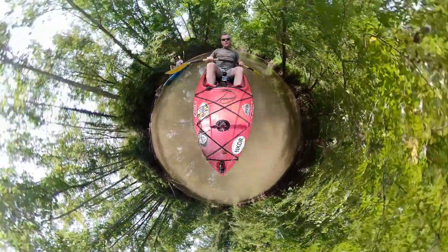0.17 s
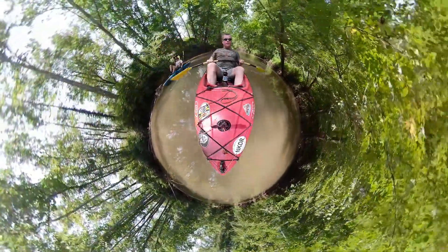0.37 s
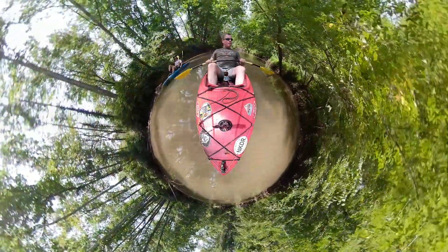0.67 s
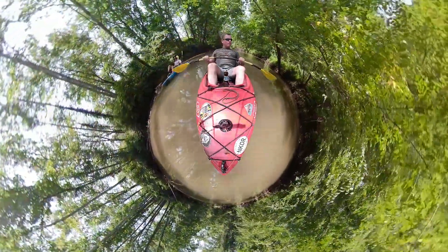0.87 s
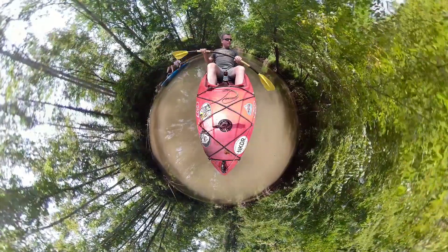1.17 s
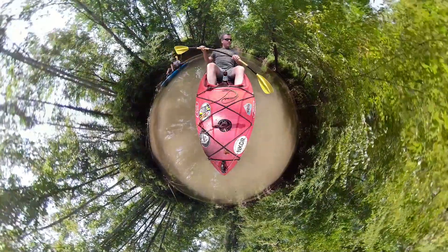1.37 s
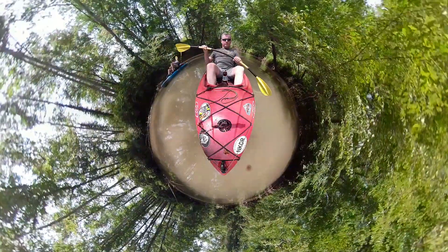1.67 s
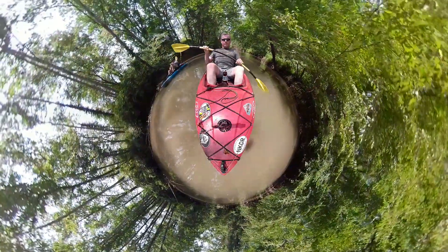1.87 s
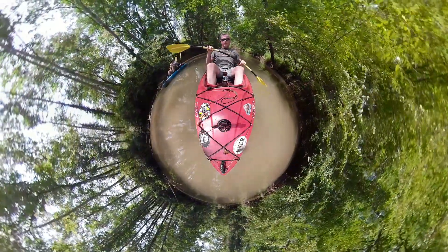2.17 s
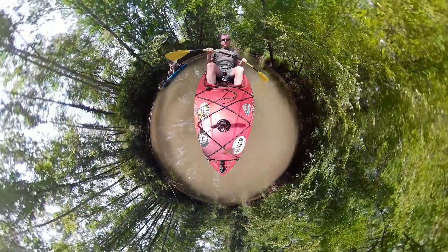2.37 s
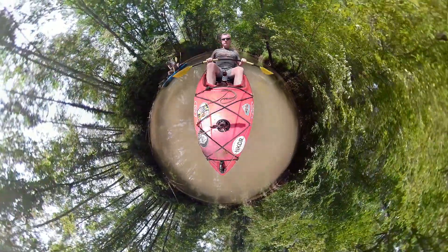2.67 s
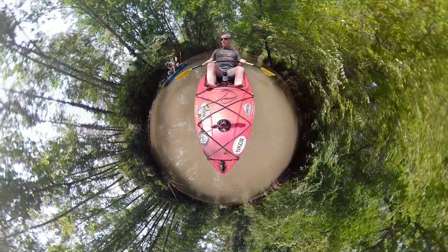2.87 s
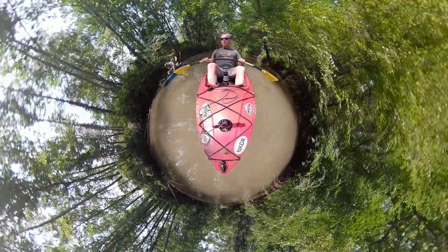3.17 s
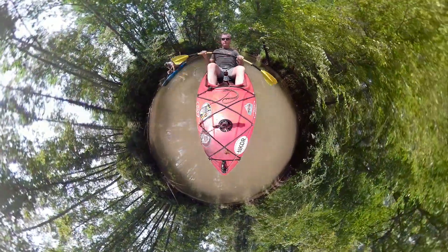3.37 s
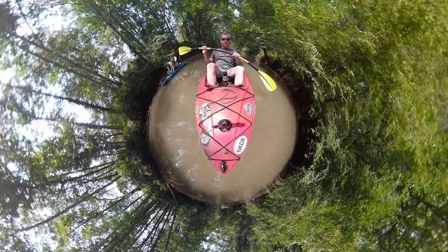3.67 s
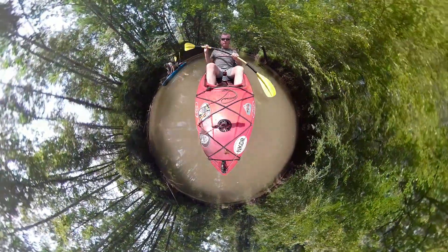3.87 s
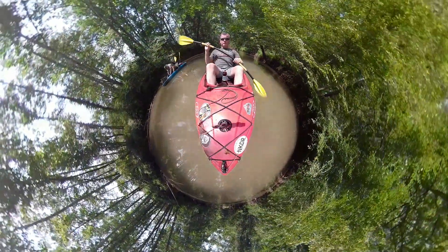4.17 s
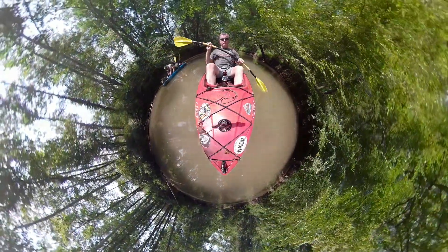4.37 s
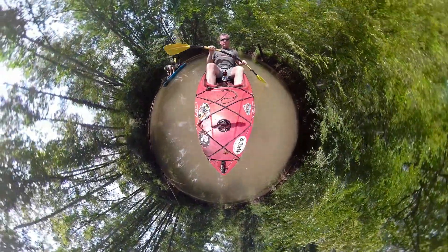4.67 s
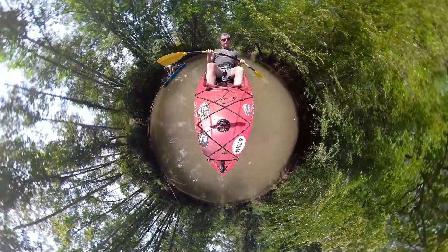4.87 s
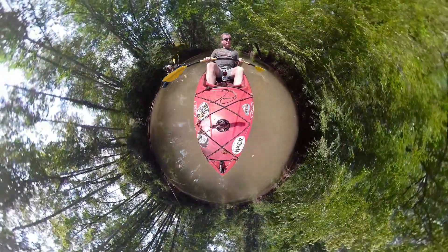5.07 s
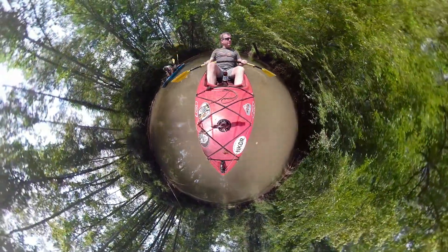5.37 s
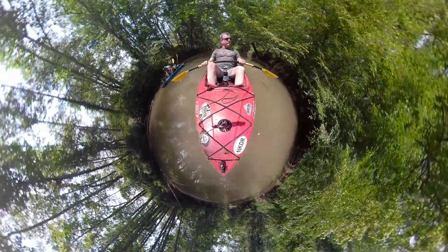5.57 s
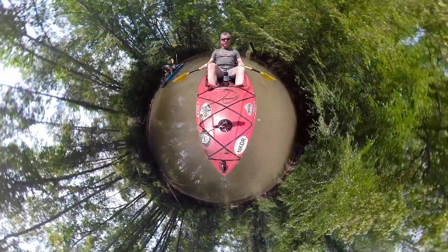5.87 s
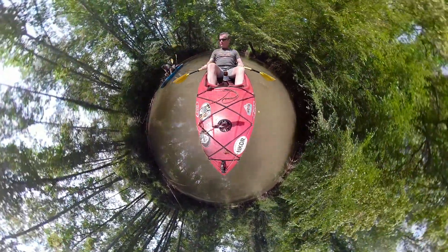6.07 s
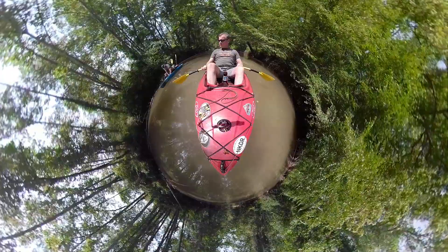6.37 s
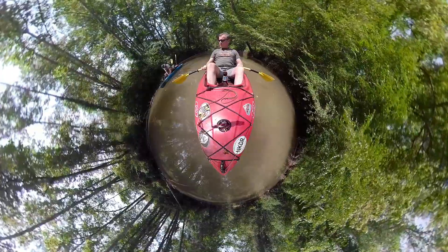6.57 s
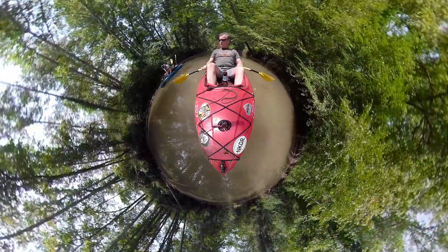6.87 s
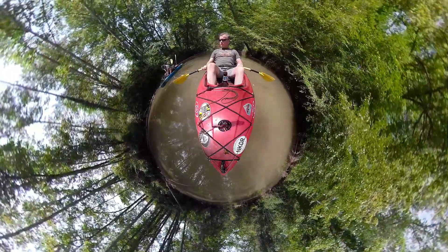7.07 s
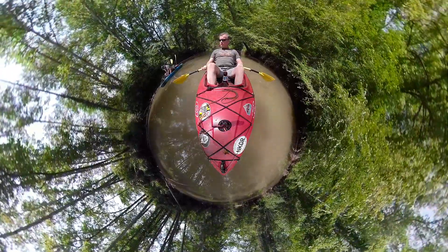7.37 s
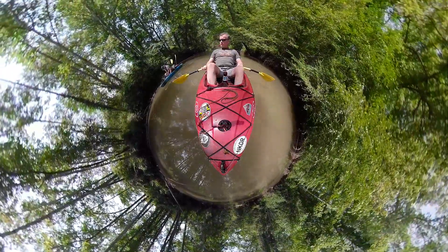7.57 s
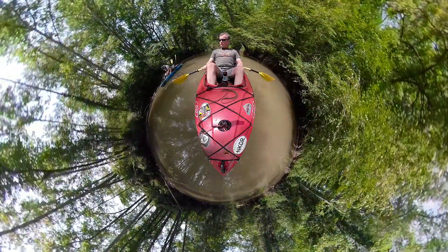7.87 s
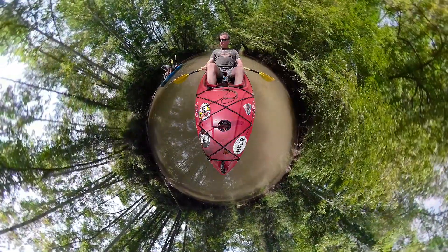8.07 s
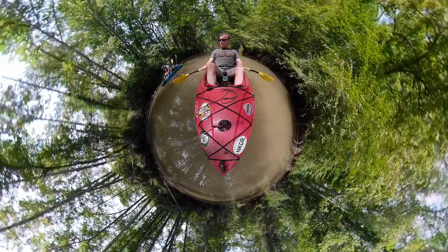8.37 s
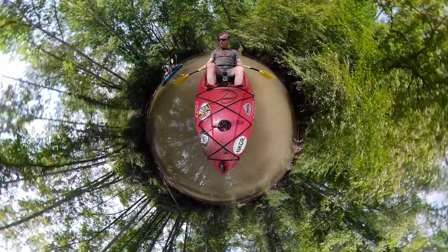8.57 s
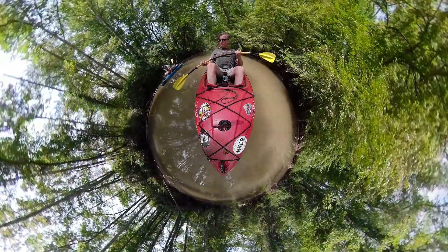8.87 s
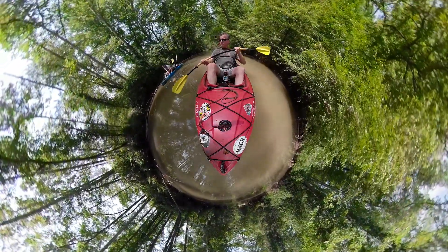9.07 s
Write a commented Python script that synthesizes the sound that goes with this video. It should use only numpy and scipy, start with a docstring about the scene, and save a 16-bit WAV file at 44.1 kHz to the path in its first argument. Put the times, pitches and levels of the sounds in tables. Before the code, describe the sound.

Water laps and knocks on a hollow kayak hull while a paddle drips and trickles, with faint birds and cicadas behind.

```python
"""On a forest river, on the deck of a drifting kayak. Water laps and knocks at the hollow hull,
which rings like a drum. The paddle sheds drips that trap ringing air bubbles, its shaft squeaks
and its blade dips with soft plops. In the trees, birds whistle with long echoes and cicadas hiss."""
import sys
import numpy as np
from scipy import signal
from scipy.io import wavfile
from scipy.ndimage import uniform_filter1d

SR = 44100
rng = np.random.default_rng(int(sys.argv[2]) if len(sys.argv) > 2 else 0)


def wav_out(sig):
    """Save sig, one row per channel (or a flat mono array), as 16-bit PCM at SR to the path in sys.argv[1]."""
    wavfile.write(sys.argv[1], SR, np.round(np.clip(np.atleast_2d(sig).T, -1, 1) * 32767).astype(np.int16))


N = 407484

# Blows on the hull, and one brief scraping rub:
# start_s, level_db, slap_db (added to level_db), spot_hz (pitch of the spot touched)
HULL_CONTACTS = [(1.502, -28.5, -10.5, 144), (1.581, -26.5, -9.5, 141), (1.619, -32.5, -11, 225),
                 (1.663, -21.5, -19, 147), (1.705, -27, -21, 207), (1.748, -27, -20.5, 96),
                 (1.815, -20.5, -24.5, 160), (2.659, -37.5, -19, 190), (2.747, -37, -19.5, 199),
                 (3.919, -32, -22, 192), (5.109, -36.5, -16, 202), (5.512, -38, -11, 219),
                 (5.928, -37, -16, 203), (6.197, -31.5, -53, 96), (6.367, -33, -65, 89),
                 (6.467, -39.5, -51, 162), (7.665, -48, -1.5, 523), (7.88, -38, 8, 300),
                 (7.892, -30, -4, 179), (7.987, -20.5, -10.5, 396), (8.024, -24.5, -5, 93),
                 (8.119, -22, -21, 166), (8.138, -24.5, -21, 168), (8.189, -28.5, -6, 302),
                 (8.222, -21, -10.5, 190), (8.489, -27.5, -6, 380)]


def knocks_and_scrape():
    """Wavelets and the paddle bump or scrape the hull: a hollow boom, and a slap the banks echo."""
    booms, slaps = np.zeros((2, N))
    bursts = rng.standard_normal((len(HULL_CONTACTS), SR // 4))
    for (start_s, level_db, slap_db, spot_hz), burst in zip(HULL_CONTACTS, bursts):
        add(booms, start_s, gain_of(level_db) * hull_boom(burst, spot_hz, slap_db))
        add(slaps, start_s, gain_of(level_db + slap_db) * deck_slap(burst, level_db + slap_db))
    treble = np.gradient(slaps)
    return booms + slaps + gain_of(1) * echo(treble, fade_s=1.0, rise_s=0.0058)


# The hull's own tones: pitch_hz, level_db, fade_s (time to drop by 60 dB)
HULL_TONES = [(99.5, 4.5, 0.37), (124.4, 5, 0.13), (152.5, 8, 0.17), (192.3, 9, 0.14), (345.5, 1.5, 0.098),
              (391, 8.5, 0.088), (516, 0, 0.12)]


def hull_boom(detunes, spot_hz, slap_db):
    """A blow rings the tones near spot_hz. A brief, higher thump grows with the slap."""
    out = 0
    for (hz, db, fade_s), detune in zip(HULL_TONES, detunes):
        t = np.maximum(np.arange(SR // 3) / SR - 0.59 / hz, 0)  # low tones arrive later
        ring_db = db - 8.5 * np.log2(hz / spot_hz) ** 2
        thump_db = db + 5.5 + 0.26 * slap_db - 3.6 * np.log2(hz / spot_hz / 2.24) ** 2
        fade = gain_of(ring_db - 60 * t / fade_s) + gain_of(thump_db - 220 * t / fade_s)
        tone = np.sin(2 * np.pi * hz * (1 + 0.067 * detune) * t)
        out += fade * tone * (1 - np.exp(-3 * hz * t))
    return out / abs(out).max()


# Where the deck rattles: pitch_hz, level_db, fade_s
DECK_BANDS = [(602, 4.5, 0.2), (800, 10, 0.083), (1495, 4.5, 0.062), (2170, -5.5, 0.025),
              (3750, -14.5, 0.027), (5100, -13.5, 0.044)]


def deck_slap(burst, level_db):
    """A wet smack rattles the thin deck in wide bands of noise. Softer blows sound duller."""
    t = np.arange(len(burst)) / SR
    tilt_db_per_octave = max(2.6 * (level_db + 32.5), -3.5)
    out = 0
    for hz, db, fade_s in DECK_BANDS:
        band = signal.lfilter(*signal.butter(2, [hz / 1.25, hz * 1.25], "band", fs=SR), burst)
        out += gain_of(db + tilt_db_per_octave * np.log2(hz / 1000) - 60 * t / fade_s) * evened(band)
    return out * (1 - np.exp(-t / 0.00033)) / abs(out).max()


# Tone colour of the rumble and of the gurgle: pitch_hz, relative_db
RUMBLE_COLOUR = [(20, -26), (75, 1), (180, -6.5), (310, -22.5), (520, -45.5), (800, -31)]
GURGLING_COLOUR = [(200, -0.5), (340, 1.5), (480, -9), (700, -17)]
# Wavelets running along the hull: start_s, hold_s, rumble_db, gurgle_db
WAVELETS = [(1.57, 0.16, -45.5, -50.5), (2.002, 0.11, -47.5, -62.5), (2.454, 0.48, -53, -62),
            (2.933, 0.34, -52.5, -64.5), (4.106, 0.62, -58, -64), (5.06, 0.084, -55.5, -52.5),
            (5.69, 0.24, -79, -59), (8.16, 0.063, -37, -47.5)]


def lapping():
    """Passing water rumbles through the hull and gurgles along its side."""
    rumble = noise(RUMBLE_COLOUR, patchy_db=1.5, flicker_db=-2.5, size=1024)
    gurgle = noise(GURGLING_COLOUR, patchy_db=6.5, flicker_db=2, size=512)
    rows = np.array(WAVELETS)
    rumble *= swells(rows[:, [0, 1, 2]], rise_db_per_s=110, fall_db_per_s=86, rest_db=-53.5)
    gurgle *= swells(rows[:, [0, 1, 3]], rise_db_per_s=110, fall_db_per_s=86, rest_db=-74)
    return rumble + gurgle


# Drops off the paddle: start_s, level_db, pitch_hz, glide (how much the pitch climbs)
PADDLE_DRIPS = [(0.03, -41, 1206, 0.0041), (0.066, -36, 1160, 0.0079), (0.088, -44, 1140, 0.0028),
                (0.204, -43.5, 930, 0.017), (0.244, -41, 1430, 0.002), (0.296, -39, 880, 0.0046),
                (0.314, -42.5, 1240, .005), (0.338, -47, 550, 0.039), (0.454, -49, 780, 0.033),
                (0.471, -38.5, 1220, 0.0035), (0.59, -44, 420, 0.1), (2.181, -51, 1290, 0.31),
                (2.223, -36.5, 1286, 0.0018), (2.25, -46.5, 700, 0.0063), (2.293, -44.5, 1560, .005),
                (2.333, -48, 1150, 0.0078), (2.369, -41.5, 750, 0.0028), (2.555, -49, 970, 0.018),
                (4.41, -43, 652, 0.0054), (4.612, -46, 930, 0.041), (4.654, -42.5, 513, 0.13),
                (4.729, -44.5, 730, 0.0038), (4.964, -46, 934, .005), (5.163, -41.5, 886, 0.014)]
# Sharp spatters of spray: start_s, level_db, pitch_hz
SPATTERS = [(0.4475, -31, 5400), (2.4026, -48, 2100), (2.5194, -42.5, 5000), (2.556, -38.5, 2700),
            (2.891, -39.5, 5600), (4.159, -48, 2670), (4.202, -37.5, 3230), (4.272, -40, 3360),
            (4.298, -44, 1800), (4.444, -42.5, 2750), (4.461, -40.5, 3360), (4.642, -37, 1880),
            (4.721, -37.5, 5600), (4.998, -38, 5600)]
# Fine spray bursting, and the crack of the hardest knocks: start_s, level_db
SHARP_TICKS = [(0.36, -28), (3.2436, -46), (4.3436, -56), (4.4883, -40), (4.8545, -51), (4.8809, -49),
               (7.8867, -25), (8.0262, -29.5)]


def drips():
    """A drop ticks and traps a bubble, which rings longer if it climbs. Spray rings briefly and snaps."""
    out = np.zeros(N)
    for start_s, db, hz, glide in PADDLE_DRIPS:
        add(out, start_s, gain_of(db) * bubble(hz, cycles=9 + 150 * min(glide, 0.04), glide=glide))
        add(out, start_s, gain_of(db - 10) * tick(3 * hz))
    for start_s, db, hz in SPATTERS:
        add(out, start_s, gain_of(db) * bubble(hz, cycles=6.2, glide=0.019))
        add(out, start_s, gain_of(db - 9) * tick())
    for start_s, db in SHARP_TICKS:
        add(out, start_s, gain_of(db) * tick())
    return out


def bubble(hz, cycles, glide):
    """A trapped bubble rings and fades, its pitch rising ever faster as it nears the surface."""
    age = np.arange(int(3 * cycles / hz * SR)) * hz / SR / cycles
    turns = cycles * age * (1 + glide * age ** 2)
    return np.sin(2 * np.pi * turns) * np.exp(-1.9 * age) * (1 - np.exp(-14 * age))


def tick(hz=9000):
    """A film of water bursts with one quick, bright swing."""
    return bubble(hz, cycles=1, glide=0)


# Tone colour of trickling water: pitch_hz, relative_db
WATER_COLOUR = [(300, -50.5), (600, 6.5), (1200, 9.5), (2500, 6), (5000, -4.5), (9000, -1.5), (13000, -29)]
# Water running off the lifted blade: start_s, hold_s, level_db
BLADE_POURS = [(0, 0.036, -63), (.2, 0.3, -59), (2.22, 0.43, -69.5), (4.22, 0.38, -64.5), (4.6, 0.36, -60),
               (5.06, 0.37, -71.5), (5.68, 0.15, -71)]


def trickle():
    """Each pour is a crowd of bubbles and ticks over a sloshing rush. A faint wash goes on between."""
    colour_hz, colour_db = np.transpose(WATER_COLOUR)
    bubbles = np.zeros(N)
    for hz in np.geomspace(350, 6000, num=40):
        size = min(1400 / hz, 1)  # the smallest bubbles are rare and only snap
        hits = random_hits(per_s=14 * size, shape=N)
        ring = bubble(hz, cycles=size ** 1.5 * rng.uniform(6, 20), glide=rng.uniform(0, 0.04))
        strength = gain_of(np.interp(np.log(hz), np.log(colour_hz), colour_db)) * np.sqrt(hz)
        bubbles += strength * signal.oaconvolve(hits, ring)[:N]
    rush = noise(WATER_COLOUR, patchy_db=5, flicker_db=3.5, size=256)
    ticks = np.zeros(N)
    for hits, hz in zip(random_hits(per_s=20, shape=(4, N)), np.geomspace(2500, 9000, num=4)):
        ticks += evened(signal.oaconvolve(hits, tick(hz))[:N])
    clumps = gain_of(5 * evened(uniform_filter1d(rng.standard_normal(N), size=1500)))
    pouring = swells(BLADE_POURS, rise_db_per_s=227, fall_db_per_s=67)
    wash = gain_of(-86) * noise(WATER_COLOUR, patchy_db=-2.5, flicker_db=5, size=512)
    return (evened(bubbles * clumps) + gain_of(-6) * rush + gain_of(-16) * ticks) * pouring + wash


# Two squeaks, then two plops: start_s, length_s, level_db, pitch_hz
PADDLE_TONES = [(7.779, 0.069, -55, 818), (7.834, 0.027, -44, 765), (9.073, .04, -69, 880),
                (9.14, 0.046, -60, 744)]


def squeaks_and_plops():
    """Short wavering tones: two squeaks of the shaft, then two soft plops as the blade dips."""
    out = np.zeros(N)
    for start_s, length_s, db, hz in PADDLE_TONES:
        add(out, start_s, whistle(length_s, db, hz, hz, hz, octave_db=-15))
    return out


# The near bird's quick rising chirps: start_s, level_db
NEAR_CHIRPS = [(0.0995, -50.5), (0.7075, -52), (1.568, -45.5), (2.8015, -47.5), (3.6694, -47),
               (4.8242, -47), (5.9009, -50), (7.074, -48.5), (8.9086, -57)]
# Notes of a farther bird and of one deep in the trees:
# start_s, length_s, level_db, first_hz, middle_hz, last_hz
FAR_SONG = [(0, 0.061, -63, 5400, 5630, 5570), (1.357, 0.11, -76, 4500, 2730, 2670),
            (1.427, 0.042, -56, 3100, 4210, 6600), (1.474, 0.018, -54, 6200, 5500, 7500),
            (2.654, 0.089, -69, 5900, 5580, 5560), (2.843, 0.045, -67, 2920, 3090, 4100),
            (2.972, 0.027, -65, 2640, 2480, 2300), (4.277, 0.029, -61, 3000, 3150, 2500),
            (5.416, 0.045, -68.5, 2510, 3040, 3960), (5.445, 0.081, -70, 3830, 2600, 2320),
            (5.568, 0.035, -66.5, 3720, 3050, 2440), (5.609, 0.03, -65, 2630, 2860, 2670),
            (7.05, 0.07, -70.5, 2770, 3560, 3760), (7.146, 0.063, -66.5, 2236, 2890, 2930)]
DEEP_CALLS = [(3.217, 0.016, -63, 1200, 2214, 3670), (3.623, 0.019, -64, 1200, 2236, 3420),
              (4.061, 0.056, -67.5, 2890, 4350, 5160), (4.419, 0.02, -57.5, 3270, 3710, 4180),
              (6.752, 0.1, -65, 6650, 5150, 3160), (8.423, 0.055, -66, 2350, 2910, 3180)]


def birds():
    """Three birds whistle and the trunks scatter the sound. The farthest is mostly echo."""
    near, far, deep = np.zeros((3, N))
    for start_s, db in NEAR_CHIRPS:
        add(near, start_s - 0.002, whistle(0.013, db, first_hz=5480, middle_hz=7300, last_hz=7800))
    for bird, notes in (far, FAR_SONG), (deep, DEEP_CALLS):
        for start_s, *note in notes:
            add(bird, start_s, whistle(*note))
    near_echo = gain_of(3.5) * echo(near, fade_s=1.34, rise_s=0.0023)
    far_echo = echo(gain_of(-0.5) * far + deep, fade_s=1.0, rise_s=0.0095)
    return near + near_echo + far + gain_of(-15) * deep + far_echo


def whistle(length_s, db, first_hz, middle_hz, last_hz, octave_db=-22):
    """A wavering tone bends through three pitches, with a weaker tone an octave above."""
    along = np.linspace(-1, 1, int(length_s * SR))
    slope_hz, curve_hz = (last_hz - first_hz) / 2, (first_hz + last_hz) / 2 - middle_hz
    hz = middle_hz + slope_hz * along + curve_hz * along ** 2
    jitter = uniform_filter1d(rng.standard_normal(SR // 8), size=200)
    waver = evened(uniform_filter1d(jitter, size=200))[:len(hz)]
    phase = 2 * np.pi * np.cumsum(hz * (1 + 0.025 * waver)) / SR
    tone = np.sin(phase) + gain_of(octave_db) * np.sin(2 * phase)
    return gain_of(db + 4.5 * waver) * tone * signal.windows.tukey(len(hz), 0.4)


# Tone colour of cicadas over still air: pitch_hz, relative_db
CICADA_COLOUR = [(900, -20.5), (4000, -45.5), (5300, -19), (6400, -21), (7100, 1.5), (7500, 5),
                 (8000, -8.5), (8500, -55.5), (9000, -33), (10400, -27.5), (11000, -81)]


def cicadas():
    """Cicadas in the trees blend into one steady, high hiss."""
    return gain_of(-60.5) * noise(CICADA_COLOUR, patchy_db=-0.6, flicker_db=-1.84, size=512)


def thin_insect(level_db=-74.5, hold_s=1.84, throbs_per_s=59):
    """One insect adds a thin, throbbing hiss that soon stops."""
    hiss = noise([(8050, -4.5), (8500, -10.5)], patchy_db=0, flicker_db=1, size=512)
    throb = 1 + 0.42 * np.sin(2 * np.pi * throbs_per_s * np.arange(N) / SR)
    return swells([(0.0082, hold_s, level_db)], rise_db_per_s=0, fall_db_per_s=170) * throb * hiss


def echo(sound, fade_s, rise_s):
    """Many small reflections blur into a tail that builds up and dies away."""
    t = np.arange(2 * SR) / SR
    tail = rng.standard_normal(len(t)) * gain_of(-60 * t / fade_s) * (1 - np.exp(-t / rise_s))
    return signal.fftconvolve(sound, tail / np.linalg.norm(tail))[:N]


def noise(colour, patchy_db, flicker_db, size):
    """Noise with a tone colour: patches of pitch swell and fade while the whole sound flickers."""
    frames, hz = 4 * N // size + 5, np.fft.rfftfreq(size, 1 / SR)
    real, imag, patches = rng.standard_normal((frames, len(hz), 3)).T
    patches = evened(uniform_filter1d(uniform_filter1d(patches, size=6, axis=0), size=6, axis=1))
    colour_hz, db = np.transpose(colour)
    shape_db = np.interp(np.log(hz + 1), np.log(colour_hz + 1), db, left=db[0] - 30, right=db[-1] - 30)
    level_db = shape_db[:, None] + patchy_db * patches + flicker_db * rng.standard_normal(frames)
    spectra = (real + 1j * imag) * gain_of(level_db)
    return evened(signal.istft(spectra, nperseg=size, noverlap=size - size // 4)[1][:N])


def swells(rows, rise_db_per_s, fall_db_per_s, rest_db=-140):
    """A loudness curve: each row is at full level by start_s, holds, then sinks toward rest_db."""
    t, power = np.arange(N) / SR, gain_of(2 * rest_db)
    for start_s, hold_s, db in rows:
        before_s, after_s = np.maximum(start_s - t, 0), np.maximum(t - start_s - hold_s, 0)
        power += gain_of(2 * (db - rise_db_per_s * before_s - fall_db_per_s * after_s))
    return np.sqrt(power)


def random_hits(per_s, shape):
    """Clicks at random moments, a few louder than the rest."""
    strength = gain_of(4 * np.minimum(rng.exponential(1, shape), 3))
    return strength * (rng.random(shape) < per_s / SR)


def gain_of(db):
    """Turn decibels into a number to multiply by."""
    return 10 ** (np.asarray(db) / 20)


def evened(x):
    """Scale a signal to an average power of 1."""
    return x / np.sqrt(np.mean(x ** 2) + 1e-20)


def add(mix, start_s, sound):
    """Mix a sound in at start_s."""
    part = mix[round(start_s * SR):][:len(sound)]
    part += sound[:len(part)]


def scene():
    """Hull, paddle, birds and insects together in one channel."""
    insects = cicadas() + thin_insect()
    paddle = drips() + trickle() + squeaks_and_plops()
    hull = lapping() + knocks_and_scrape()
    paddle_echo = gain_of(-7.5) * echo(paddle, fade_s=0.047, rise_s=0.00095)
    return (hull + paddle + paddle_echo + birds() + insects)[None]


def record(dry, cutoff_hz=12800):
    """The microphone's waterproof case dulls the high treble. Sound above cutoff_hz is cut away."""
    treble = gain_of(-9.5)
    case = signal.firwin2(255, [0, 8300, 9000, SR / 2], [1, 1, treble, treble / 4], fs=SR)
    cutoff = signal.firwin(511, cutoff_hz, window=("kaiser", 9), fs=SR)
    return signal.oaconvolve(dry, np.convolve(case, cutoff)[None], "same")


dry = scene()
out = record(dry)
wav_out(out)
```